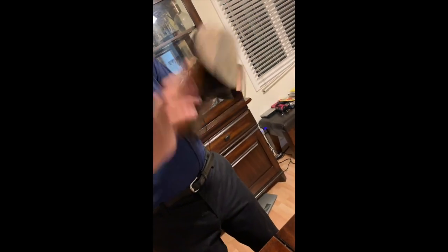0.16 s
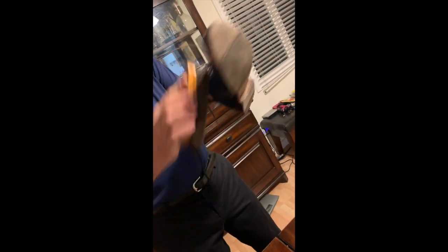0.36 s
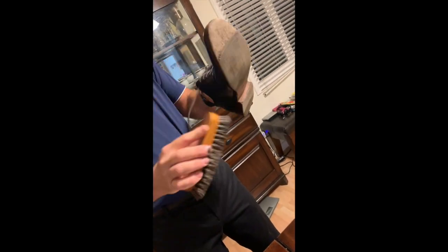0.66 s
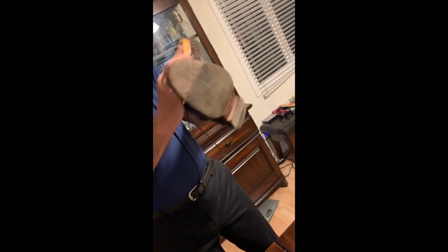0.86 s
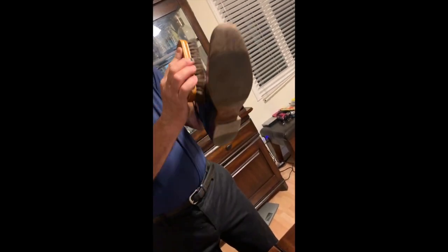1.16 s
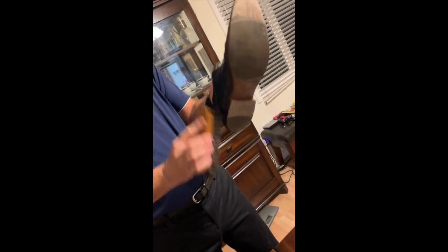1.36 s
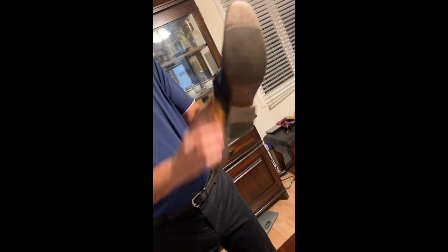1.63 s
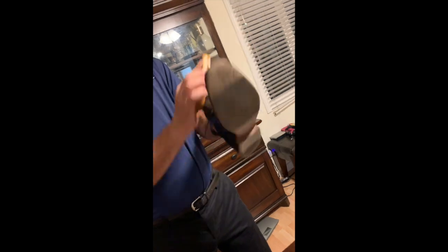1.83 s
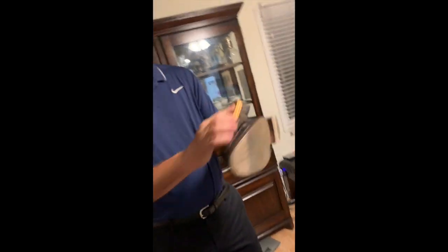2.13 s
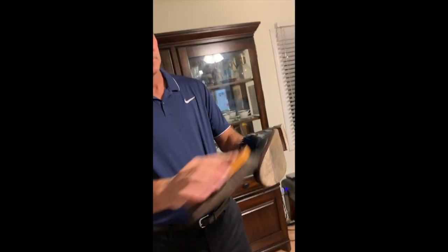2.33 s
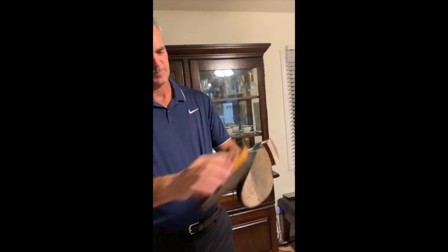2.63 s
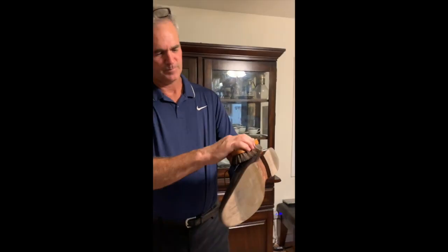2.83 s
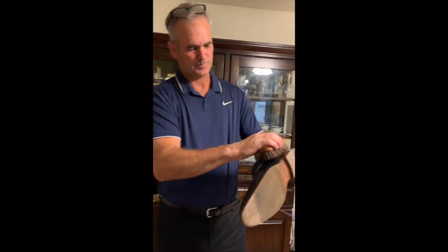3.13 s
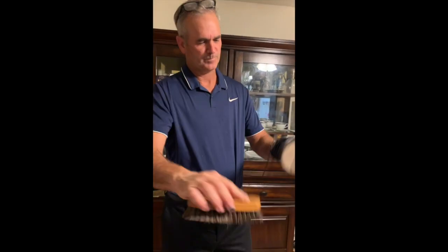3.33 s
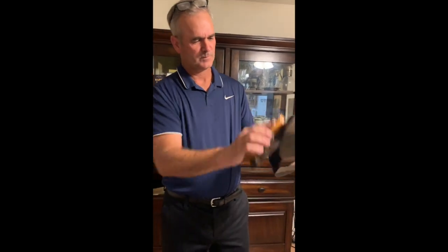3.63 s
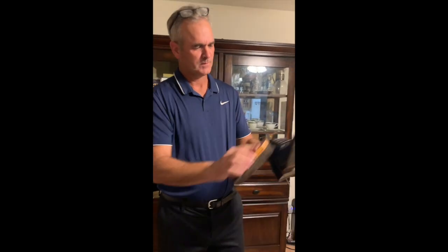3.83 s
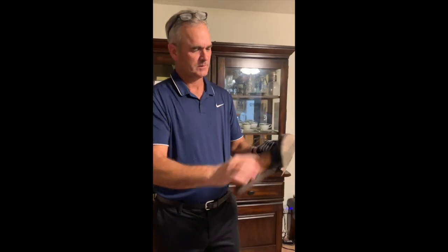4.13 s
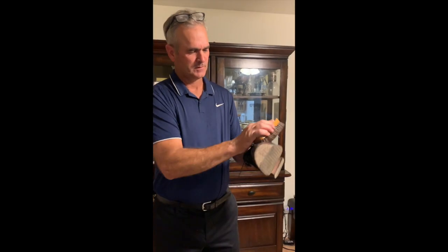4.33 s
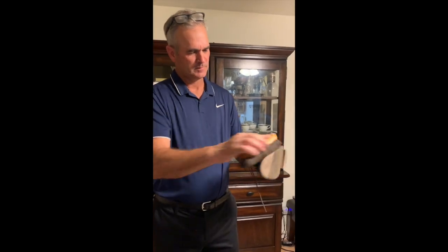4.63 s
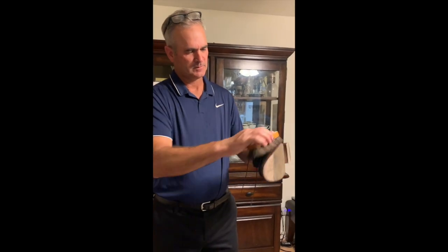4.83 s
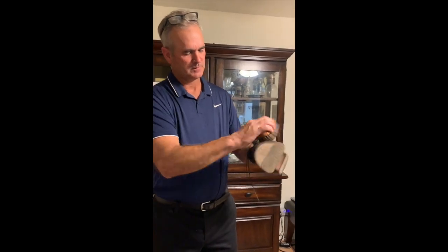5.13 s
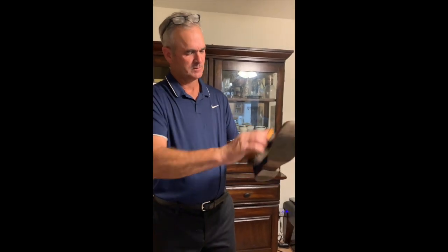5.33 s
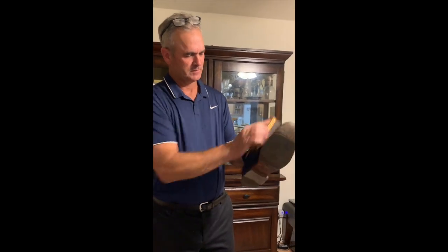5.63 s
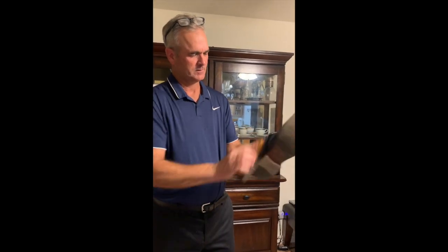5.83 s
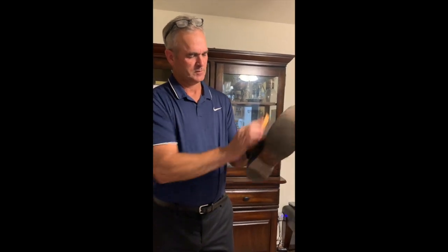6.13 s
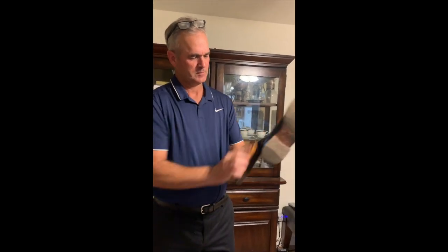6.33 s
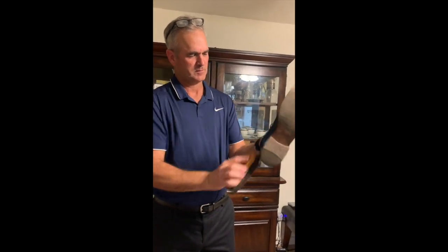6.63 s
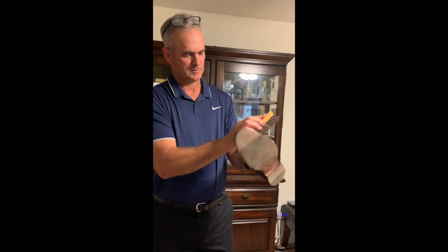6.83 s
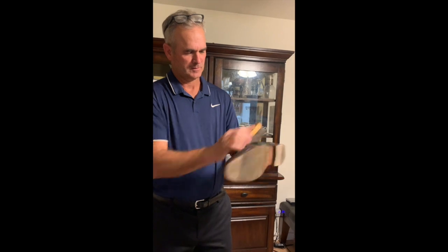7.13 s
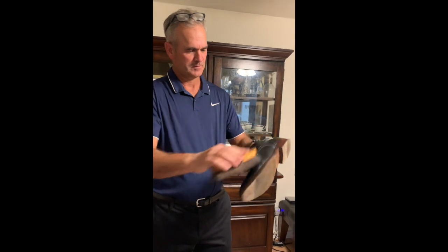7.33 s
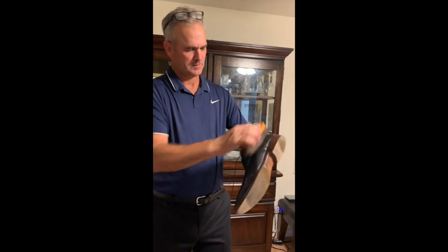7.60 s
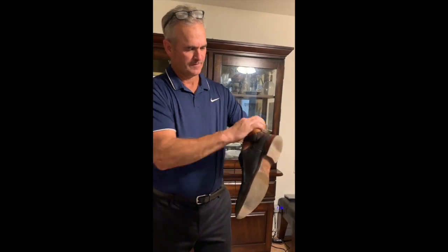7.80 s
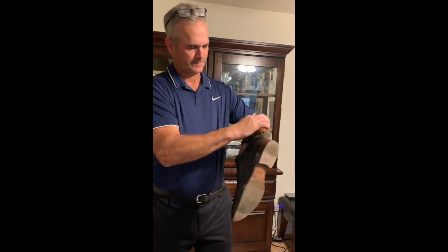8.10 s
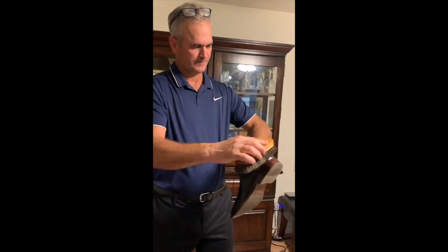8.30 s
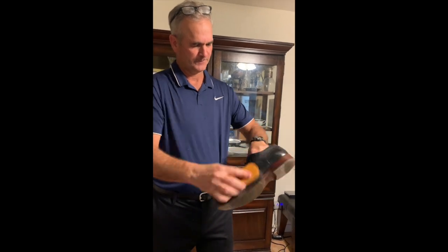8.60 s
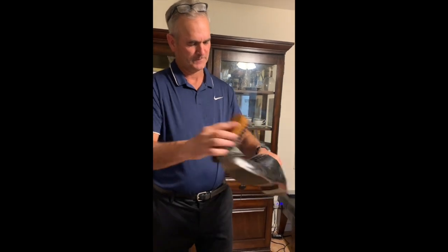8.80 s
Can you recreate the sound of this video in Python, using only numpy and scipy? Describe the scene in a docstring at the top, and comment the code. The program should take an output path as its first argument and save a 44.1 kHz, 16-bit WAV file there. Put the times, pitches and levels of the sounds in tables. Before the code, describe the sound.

A bristle brush buffs a leather shoe in quick to-and-fro strokes, hissing and rasping, with hollow thumps and dry ticks over a faint indoor hum.

```python
"""In a furnished room, a bristle brush buffs a leather shoe in quick to-and-fro strokes.
Shaped noise hisses and rasps with each stroke's speed, and resonances ring the rubbed leather.
The hollow shoe thumps in short sinking swings, dry ticks crack, an appliance hums, the house rumbles.
Widened stereo: the left and right channels turn against each other in phase as frequency rises."""
import sys
import numpy as np
from scipy import signal
from scipy.fft import rfft, irfft, next_fast_len
from scipy.io import wavfile
from scipy.ndimage import uniform_filter1d, map_coordinates

SR = 44100
rng = np.random.default_rng(int(sys.argv[2]) if len(sys.argv) > 2 else 0)


def store_pcm(level_fs):
    """Save levels as 16-bit WAV."""
    pcm = np.round(np.clip(level_fs, -1, 1) * 32767).astype(np.int16)
    wavfile.write(sys.argv[1], SR, np.atleast_2d(pcm).T)


N = 395136  # length in samples

# Resonances of the hollow shoe: f/Hz, width/Hz, level/dB before mixing
SHOE_MODES = [(203, 44, 1.5), (357, 33, -0.5), (418.4, 25, -3), (493, 57, -3), (587, 103, -3)]


def amp(db):
    """Turn decibels into a gain."""
    return 10 ** (np.asarray(db) / 20)


def unit(x):
    """Scale a signal to rms 1."""
    return x / np.sqrt(np.mean(x ** 2) + 1e-20)


def along(points, hz):
    """Read a curve of (f/Hz, value) points on a log frequency axis."""
    f, v = np.transpose(points)
    return np.interp(np.log(hz + 1), np.log(f + 1), v)


def over_time(points):
    """Read a curve of (t/s, value) points at every sample."""
    return np.interp(np.arange(N) / SR, *np.transpose(points))


def wobble(rate):
    """Draw a smooth random curve with `rate` random points a second."""
    knots = rng.standard_normal(int(N * rate / SR) + 4)
    coarse = np.arange(0, N + 32, 32)
    curve = map_coordinates(knots, [coarse * rate / SR])
    return np.interp(np.arange(N), coarse, curve)


def filtered(x, response):
    """Shape x by a complex response of frequency."""
    m = next_fast_len(N + SR // 2)
    spectrum = rfft(x, m) * response(np.fft.rfftfreq(m, 1 / SR))
    return irfft(spectrum, m)[..., :N]


def modes(table):
    """Response of bodies that ring only after they are pushed; neighbours alternate in sign."""
    def response(hz):
        total = 0
        for k, (center, width, db) in enumerate(table):
            drag = 1j * hz * width
            total = total + (-1) ** k * amp(db) * drag / (center * center - hz * hz + drag)
        return total
    return response


def rush(spectrum, patchy_db, spiky_db):
    """Two unrelated paths of dense noise grains with patches of random gain, rms 1."""
    grains = rng.standard_normal((2, N)) * amp(spiky_db * rng.standard_normal(N))
    z = signal.stft(grains, nperseg=512)[2]
    # Smoothing makes patches of neighbouring frequencies and moments
    field = uniform_filter1d(rng.standard_normal(z.shape[1:]), size=3, axis=0)
    field = uniform_filter1d(field, size=6, axis=1)
    pair = signal.istft(z * amp(patchy_db * unit(field)), nperseg=512)[1][:, :N]
    return unit(filtered(pair, lambda hz: amp(along(spectrum, hz))))


def rumble():
    """The house rumbles: shaped noise swells slowly as room tone."""
    # Slow swell of the room tone: t/s, level/dB before wobble
    swell = [(0.0, -54), (0.42, -53.5), (0.77, -57), (2.2, -55), (3.37, -56.5), (4.16, -50.5), (4.32, -56),
             (6.06, -57.5), (7.24, -50), (7.96, -57.5), (8.43, -53), (8.96, -54)]
    # Relative spectrum of the room tone: f/Hz, density/dB per Hz
    tone_spectrum = [(20, -65), (33, -18), (45, -3), (90, 3.5), (150, -4), (190, -8), (400, -8.5),
                     (560, -17), (1500, -26.5), (4000, -32.5), (6200, -34.5), (8500, -47), (16000, -48)]
    swell_db = over_time(swell)
    return amp(swell_db + 0.63 * wobble(3.5)) * rush(tone_spectrum, patchy_db=1.5, spiky_db=-0.5)


def hum():
    """An appliance hums: steady tones waver a little in level and phase."""
    # Tones of the hum: f/Hz, level/dB rms before wavering and left-right balance
    tones = [(120, -67.5), (240, -56), (345, -73.5), (408, -68.5)]
    t = np.arange(N) / SR
    total = np.zeros(N)
    for hz, db in tones:
        level = np.sqrt(2) * amp(db + 0.66 * wobble(8))
        total += level * np.sin(2 * np.pi * hz * t + 0.21 * wobble(9))
    return total


def strokes():
    """Gains of hiss, rasp and sheen: each pass touches, speeds up to a peak and slows down."""
    # Passes of the brush: landing t/s, speeding-up time/s, slowing time/s (shortest 0.04),
    # touch level under the peak/dB (sign ignored), hiss peak/dB, rasp over hiss/dB, sheen over hiss/dB.
    # Slowing time is for a 20 dB fall; falls and touch are before `steepness`, peaks before bite and mix.
    passes = [(-0.091, 0.082, 0.09, 13, -45.5, 2, -4), (0.056, 0.093, 0.08, 12.5, -47, 1.5, -3.5),
              (0.383, 0.027, 0.12, 3, -48.5, 7.5, -6), (0.506, 0.065, 0.135, 7, -49, 1, -3.5),
              (0.711, 0.047, 0.15, 6, -50, 4, -3.5), (0.837, 0.066, 0.18, 17, -49.5, 1.5, -1.5),
              (1.068, 0.022, 0.16, 0, -48.5, 2.5, -4.5), (1.179, 0.079, 0.14, 11, -47.5, 2, -0.5),
              (1.418, 0.025, 0.11, 5, -48.5, 3, -6.5), (1.529, 0.07, 0.11, 16, -45.5, 1.5, -1.5),
              (1.752, 0.036, 0.13, 3.0, -46.5, 3.5, -3), (1.87, 0.095, 0.17, 6, -50.5, 1, -6),
              (2.099, 0.026, 0.12, 1, -44, -1, -11), (2.238, 0.065, 0.04, 4, -50.5, -5.5, -2),
              (2.398, 0.047, 0.12, 12.5, -43, 0, -4.5), (2.533, 0.066, 0.2, 11, -49, -1.5, -1.5),
              (2.707, 0.034, 0.2, 1, -48, 2, -3.5), (2.85, 0.061, 0.17, 4, -52, 2, -0.5),
              (2.997, 0.076, 0.09, 7.5, -50, 3, -3), (3.108, 0.11, 0.1245, 15, -48, 2.0, 1),
              (3.527, 0.013, 0.17, 21, -55.5, 3.0, -4), (3.562, 0.089, 0.11, 8.5, -54, 3, -1.5),
              (3.856, 0.018, 0.14, 18, -50, 5.5, -6), (3.993, 0.1, 0.1, 6, -50.5, 2.5, -5),
              (4.226, 0.045, 0.13, 4, -51.0, 5.5, -6.5), (4.335, 0.11, 0.18, 16.0, -51, 2.5, -7.0),
              (4.622, 0.049, 0.12, 1.0, -47.5, 2.5, -6), (4.765, 0.059, 0.12, 11, -50.5, 2, -2.5),
              (4.947, 0.083, 0.15, 6, -50.5, 3, -6), (5.124, 0.055, 0.23, 8, -59, 1.5, -4.5),
              (5.261, 0.069, 0.16, 18, -49.5, 2, -4.5), (5.563, 0.051, 0.16, 2.5, -51.5, 4, -6),
              (5.71, 0.1, 0.17, 13.5, -48.5, 2, -2.5), (5.958, 0.036, 0.14, 3, -50.0, 4, -7),
              (6.103, 0.065, 0.115, 10, -47, 0, -2), (6.346, 0.047, 0.1, 8.5, -50.5, 3, -2),
              (6.497, 0.074, 0.15, 9, -49.0, 3.5, -0.5), (6.738, 0.033, 0.2, 2.0, -50.5, 6, -7.5),
              (6.858, 0.094, 0.19, 23.0, -51.5, 1, -4.5), (7.113, 0.025, 0.11, -1, -46.5, 0.5, -8.5),
              (7.206, 0.085, 0.1, 16, -51, 0.5, -5), (7.411, 0.033, 0.18, 6, -48, 0.5, -1.5),
              (7.559, 0.055, 0.16, 9.0, -50.5, -4.5, -3), (7.707, 0.041, 0.15, 0, -49.5, 3, 1),
              (7.84, 0.055, 0.15, 10.5, -52.5, -0.5, 7.5), (7.98, 0.048, 0.33, 10.0, -56.5, -6, 8),
              (8.06, 0.12, 0.14, 25, -48.5, 2, -1), (8.383, 0.0028, 0.2, 5, -55, 4.5, -1),
              (8.411, 0.13, 0.05, 8, -57.5, 1, 1.5), (8.621, 0.033, 0.13, 9, -54, 1.5, -3),
              (8.698, 0.064, 0.14, 10, -61, 4.5, -4.5)]
    steepness = np.array([[1.135], [0.87], [1.55]])  # how much hiss, rasp, sheen follow the speed
    roundness = 1.157  # of the swell
    touch_s, graze_s = 0.0013, 0.01  # the brush lands; its longest bristles graze first
    soft_db = 12  # a touch this far under the peak has no edge
    bite_db, bite_s = 0.5, 0.014  # the bristles dig in briefly
    before = SR // 20
    t = (np.arange(SR // 2) - before) / SR
    power = np.zeros((3, N + 2 * SR))  # starts one second early
    landed = (1 + np.tanh(t / touch_s)) / 2
    bite = bite_db * np.exp(-np.abs(t) / bite_s)
    for s, rise, fall, touch_db, db, rasp_db, sheen_db in passes:
        speeding_db = np.abs(touch_db) * np.abs(1 - t / rise) ** roundness
        slowing_db = 20 * np.abs((t - rise) / max(fall, .04)) ** roundness
        under_peak_db = np.where(t < rise, speeding_db, slowing_db)
        graze = np.clip(np.abs(touch_db) / soft_db, .2, 1) * np.exp(-(t / graze_s) ** 2)
        contact = landed + (1 - landed) * graze
        peak_db = db + np.array([[0], [rasp_db], [sheen_db]]) + bite
        gain = amp(peak_db - steepness * under_peak_db) * contact
        start = SR - before + round(s * SR)
        power[:, start:start + len(t)] += gain ** 2
    return np.sqrt(power[:, SR:SR + N])


def flexing(table):
    """Rubbed leather, rms 1: each mode comes and goes as the hand inside bends it."""
    total = np.zeros(N)
    for mode in table:
        total += amp(3.5 * wobble(9)) * filtered(rng.standard_normal(N), modes([mode]))
    return unit(total)


def bristles():
    """Thousands of bristle tips slip on the leather; their drag shakes the shoe and rings its upper."""
    # Relative spectra of the rubbing noises: f/Hz, density/dB per Hz
    hiss_spectrum = [(1200, -21), (2700, -9.5), (4200, -1), (6200, -.5), (7400, -2), (8700, -2.5),
                     (11000, -9.5), (16000, -15)]
    sheen_spectrum = [(6000, -28), (8500, -3), (10500, -0.5), (13500, -2.5), (16000, -3.5)]
    rasp_spectrum = [(120, -22), (250, -3.5), (500, -3), (900, -6), (1600, -7.5), (2600, -12.5),
                     (4500, -19), (8000, -47)]
    # Drumming of the hollow shoe: t/s, level/dB before the rasp's stroke gain
    drumming = [(0, 0), (1.6, -7.5), (2.5, -5), (3.3, -4.5), (4.4, -2.5), (5.3, -3.5), (6.2, -7),
                (7.4, -14), (8.96, -11)]
    # Resonances of the stretched upper, then the stiff heel end: f/Hz, width/Hz, relative level/dB
    upper_modes = [(722.4, 18, 5.5), (828, 23, 8.5), (993, 12, 0), (1245, 32, 4), (1613, 44, -4)]
    heel_modes = [(348.7, 21, 6), (574, 9.9, 3.5), (887, 34, -8.5), (1340, 21, -3), (2067, 69, -1.5)]
    # Ringing of upper and heel as the shoe is turned: t/s, level/dB before ring_db and stroke gain
    upper_grip = [(0, 1), (.8, 5), (1.7, 7.5), (2.4, -16), (3.5, 1), (4.5, -1), (5.2, -6), (5.8, 6),
                  (6.8, 4), (7.7, 2.5), (8.96, 1.5)]
    heel_grip = [(0, -8), (1, 1), (1.9, -6), (2.5, -3), (3.3, 6), (4, 2.5), (5.3, -11), (6.2, -5.5),
                 (7, -10), (8.96, -14)]
    hiss_db, sheen_db, rasp_db, ring_db = 4, 8, 1.5, -9.5  # mix of the layers

    hiss_gain, rasp_gain, sheen_gain = strokes() * amp(0.41 * wobble(45))  # tufts catch and let go
    hiss = amp(hiss_db) * rush(hiss_spectrum, patchy_db=2.0, spiky_db=1.5)
    sheen = amp(sheen_db) * rush(sheen_spectrum, patchy_db=1.5, spiky_db=1.0)
    rasp = amp(rasp_db + 0.68 * wobble(90)) * rush(rasp_spectrum, patchy_db=4.5, spiky_db=3.5)
    shaken = unit(filtered(rng.standard_normal((2, N)), modes(SHOE_MODES)))
    drum = amp(over_time(drumming)) * shaken
    ring = amp(ring_db + over_time(upper_grip)) * flexing(upper_modes)
    ring += amp(ring_db + over_time(heel_grip)) * flexing(heel_modes)
    scrub = hiss_gain * hiss + sheen_gain * sheen + rasp_gain * (rasp + drum)
    return scrub, rasp_gain * ring


def thumps():
    """Each jolt is a soft blow: a compact swing of the sole sinks in pitch as the shoe's modes rattle."""
    # Jolts of the shoe: start t/s, level/dB before the blow's shape, nominal sole pitch f/Hz
    jolts = [(0.098, -39, 234), (0.395, -23, 329.5), (0.58, -39, 231), (0.615, -38, 230), (0.711, -36, 315),
             (0.93, -35.5, 282), (0.881, -32, 480), (1.071, -20, 406), (1.08, -29, 428), (1.199, -37, 360),
             (1.424, -36, 338), (1.768, -29.5, 380), (1.776, -30, 341), (1.974, -40, 244),
             (2.423, -23.5, 301), (2.441, -30, 523), (2.721, -31.5, 470), (3.64, -35.5, 305),
             (3.687, -31, 209), (3.883, -23.5, 255), (4.26, -25.5, 248), (4.1, -35.5, 272),
             (3.934, -30, 340), (4.274, -24, 250), (4.623, -29.5, 211), (4.634, -31, 261), (4.66, -34, 300),
             (4.674, -33.5, 328), (4.824, -38, 256), (5.019, -43, 207), (5.32, -36, 298),
             (5.333, -29.5, 410), (5.492, -44, 404), (5.565, -38, 204), (5.61, -31.5, 490),
             (5.791, -49.5, 196), (6.144, -46, 229), (6.738, -33.5, 259), (6.762, -35, 298),
             (6.774, -33, 259), (7.114, -46, 183), (7.71, -42, 616)]
    rattle_db = 9.5  # over the blow, before the modes
    t = np.arange(SR // 2) / SR
    swing, push = np.zeros(N + SR), np.zeros(N + SR)
    for s, db, hz in jolts:
        # The pitch sinks from about 1.33 to 0.78 times nominal
        cycles = hz * (0.78 * t + 0.00482 * (1 - np.exp(-t / 0.0088)))
        burst = np.exp(-((cycles - 1.9) / 0.5) ** 2)
        tail = 0.22 * amp(-60 * t / 0.16) * (1 - np.exp(-t / 0.0029))
        rattle = amp(db + rattle_db - 60 * t / 0.21) * (1 - np.exp(-t / 0.0022))
        start = round(s * SR)
        span = slice(start, start + len(t))
        swing[span] += amp(db) * (burst + tail) * np.cos(2 * np.pi * cycles)
        push[span] += rattle * rng.standard_normal(len(t))
    return swing[:N] + filtered(push[:N], modes(SHOE_MODES))


def ticks():
    """A stiff tuft or the wooden back catches an edge: a dry noise crack with a woody body."""
    # Cracks: start t/s, noise level/dB before the woody body
    cracks = [(0.381, -45.5), (0.676, -31), (1.056, -47), (1.7512, -41), (2.103, -47), (2.3975, -46),
              (2.714, -48), (3.116, -54), (3.489, -65), (3.5368, -46), (4.6225, -37), (4.946, -52),
              (5.3232, -43), (5.551, -53), (5.613, -49), (5.833, -35), (5.957, -53), (6.348, -48),
              (6.739, -42), (7.1185, -52), (7.71, -43), (8.377, -60), (8.384, -45)]
    t = np.arange(SR // 10) / SR
    out = np.zeros((2, N + SR))
    for s, db in cracks:
        snap = amp(db - 60 * t / 0.013)
        tail = amp(db - 13.5 - 60 * t / 0.2)
        start = round(s * SR)
        out[:, start:start + len(t)] += (snap + tail) * rng.standard_normal((2, len(t)))
    body = modes([(1200, 2000, 0)])
    return filtered(out[:, :N], lambda hz: 1 + body(hz))


def room(x, count=28):
    """The shoe keeps moving, so each moment gets new tails; each frequency dies at its own speed."""
    # Echo decay of the room: f/Hz, time to fall 60 dB/s
    decay = [(150, 0.26), (600, 0.15), (4000, 0.21), (12000, 0.046)]
    hop = N // count
    hz, t, z = signal.stft(rng.standard_normal((count + 1, 2, hop)), SR, nperseg=256)
    fading = amp(-60 * t / along(decay, hz)[:, None])
    tails = signal.istft(z * fading, SR, nperseg=256)[1]
    padded = np.pad(x, ((0, 0), (hop, 2 * hop)))
    out = np.zeros((2, N + 6 * hop))
    for k, tail in enumerate(tails):
        # Overlapping pieces fade from one tail to the next
        piece = padded[:, k * hop:(k + 2) * hop] * np.hanning(2 * hop)
        wet = signal.fftconvolve(piece, tail / np.linalg.norm(tail[0]), axes=1)
        out[:, k * hop:k * hop + wet.shape[1]] += wet
    return out[:, hop:hop + N]


def widened(paths):
    """Widened stereo: left and right turn apart in phase with frequency; path two is what they do not share."""
    # Phase of left ahead of right: f/Hz, angle/radians before the bend
    lead = [(30, -0.3), (260, 0.5), (520, -2), (860, -2.5), (1200, -2), (1600, -5.5), (2600, -4.5),
            (3600, -5), (4750, -3)]
    # Likeness of the left and right sound: f/Hz, likeness/0 to 1
    alike = [(60, .97), (250, .9), (520, .55), (1200, .2), (1700, .5), (2800, .55), (3900, .9), (4300, 1)]
    # Part of the side signal tied to the mid: f/Hz, share/0 to 1
    tied = [(2500, 1), (4300, .65)]
    # Balance of the channels: f/Hz, left over right/dB
    balance = [(60, -1.7), (250, 3), (600, -1.5), (1200, -1), (3000, -0.37)]
    lag_s = 1 / 4290  # how fast the angle turns above the last lead point, before the bend
    bend = 0.18  # bends the phase turn, flatter near in phase and out of phase, 0-0.5

    def mix(hz):
        turn = along(lead, hz) + 2 * np.pi * lag_s * np.maximum(hz - lead[-1][0], 0)
        half = (turn - bend * np.sin(2 * turn)) / 2
        spread, firm = np.arccos(along(alike, hz)) / 2, along(tied, hz)
        even, odd = np.cos(half), 1j * np.sin(half)
        shared, apart = np.cos(spread), np.sin(spread)
        mid = [even * shared, odd * apart]
        loose = np.sin(half) * shared * np.sqrt(1 - firm ** 2)
        side = [odd * shared * firm, loose + even * apart]
        return np.array([mid, side])

    def tilt(hz):
        return amp(along(balance, hz) * np.array([[.5], [-.5]]))

    mid, side = filtered(paths, mix).sum(axis=1)
    return filtered(np.array([mid + side, mid - side]), tilt)


def scene():
    """Brush, shoe and room in widened stereo; the ringing leather is equal left and right, the hum leans left."""
    scrub, ring = bristles()
    jolts = thumps()
    near = scrub + ticks() + jolts * amp([[0], [-12]])  # the second path gets less of the jolts
    wet = room(scrub * amp(-7.0) + jolts * amp(-6.5))
    return widened(near + wet + rumble()) + ring + hum() * amp([[.6], [-.6]])


def record(dry):
    """Keep nothing at or above the band limit."""
    top_hz = 15750
    return filtered(dry, lambda hz: hz < top_hz)


dry = scene()
out = record(dry)
store_pcm(out)
```